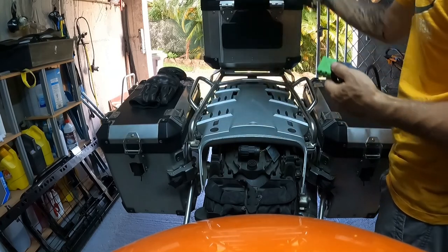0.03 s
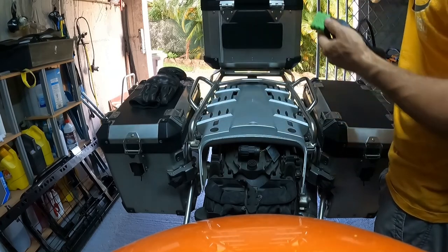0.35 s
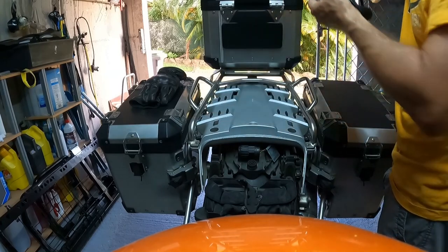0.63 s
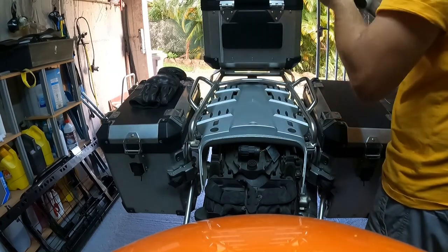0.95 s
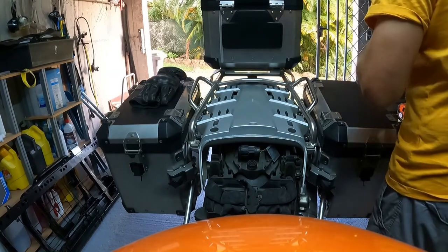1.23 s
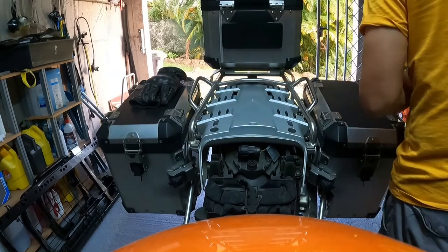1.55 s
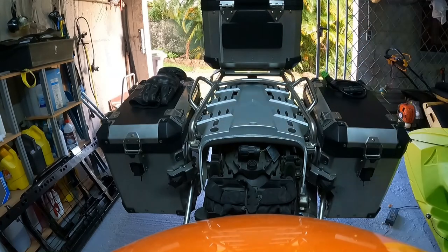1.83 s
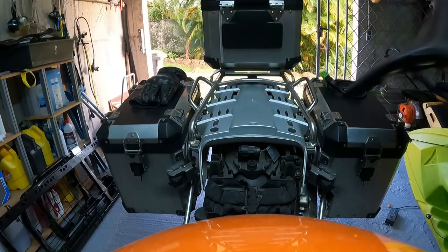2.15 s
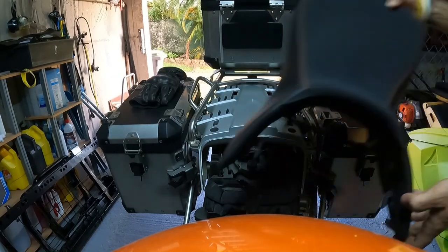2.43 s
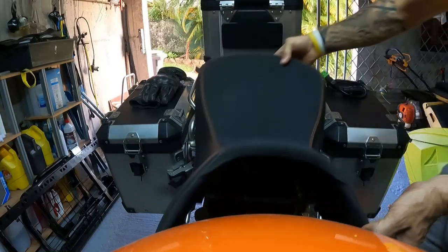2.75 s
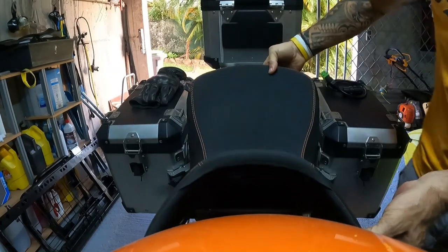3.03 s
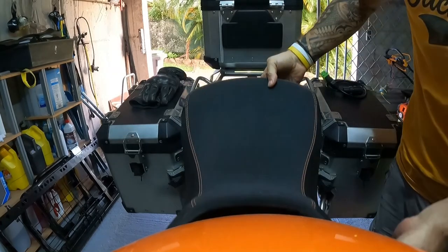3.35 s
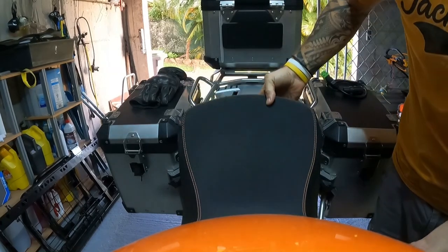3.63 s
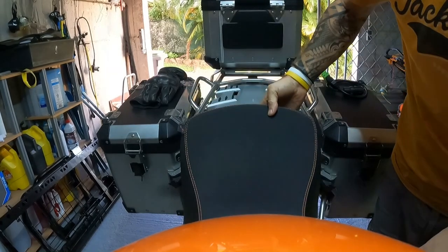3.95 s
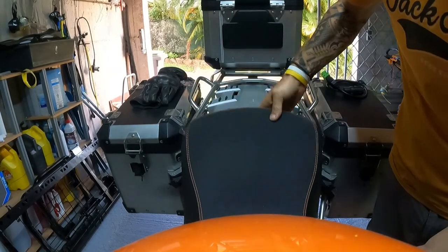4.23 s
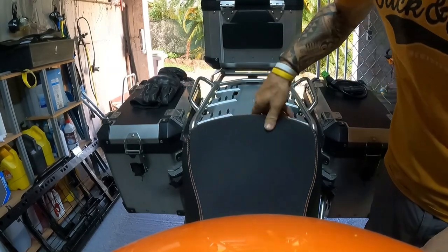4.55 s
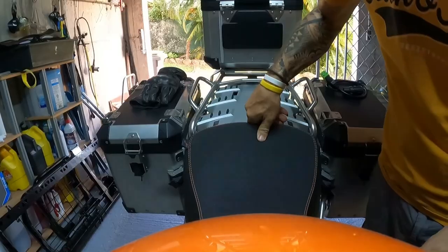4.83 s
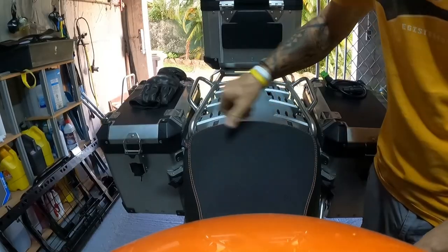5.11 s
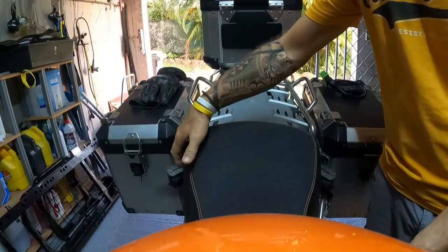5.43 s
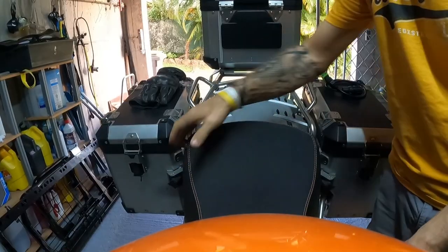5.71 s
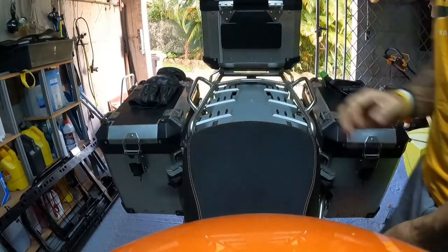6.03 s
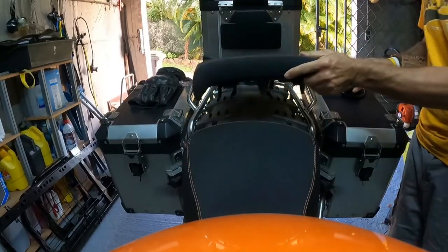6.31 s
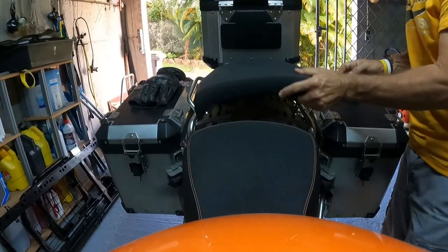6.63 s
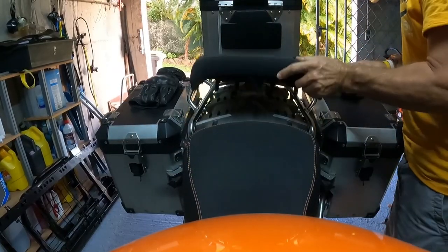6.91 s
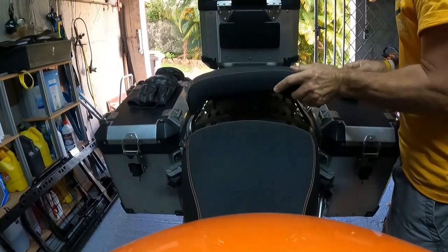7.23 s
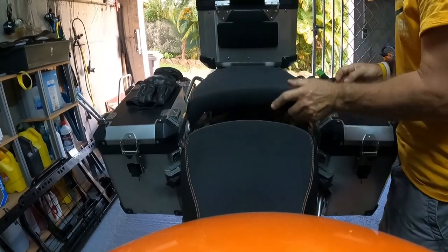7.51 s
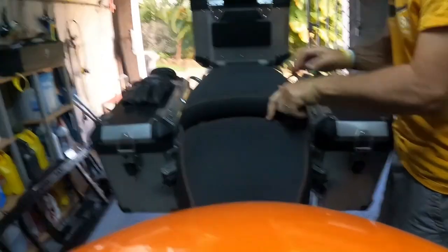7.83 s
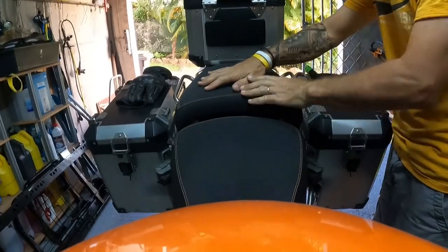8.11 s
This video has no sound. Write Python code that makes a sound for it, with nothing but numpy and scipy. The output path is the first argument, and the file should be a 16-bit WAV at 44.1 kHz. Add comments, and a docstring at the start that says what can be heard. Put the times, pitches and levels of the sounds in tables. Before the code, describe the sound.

Two motorcycle seats knock, scrape and thump into place one after the other, with rustling clothes, close up in a small garage.

```python
"""Two motorcycle seats go on in a small garage, heard close on a stereo microphone fixed to the bike.
A faint hoot sounds far off; clothes and vinyl rustle as the front seat is carried over, its plastic
pan knocking. From about 3 s it creaks and scrapes along the frame, and at 4.8 s it thumps home on its
rubber buffers and the steel latch catches. From 6 s the hollower rear seat clatters into place and is
pressed shut at 7.9 s. All along, shoves rock the bike and quiet air comes in at the open door."""
import sys
import numpy as np
from scipy import signal
from scipy.fft import rfft, irfft
from scipy.io import wavfile
from scipy.ndimage import uniform_filter1d

SR = 44100
rng = np.random.default_rng(int(sys.argv[2]) if len(sys.argv) > 2 else 0)


def persist_wave(psi):
    """Save psi, clipped to +-1, as 16-bit WAV."""
    counts = np.round(np.clip(psi, -1, 1) * 32767).astype(np.int16)
    wavfile.write(sys.argv[1], SR, np.atleast_2d(counts).T)


N = 364707
TIME = np.arange(N) / SR

# Levels in a table are relative to its other rows; each source adds its own gain.
# pan and fittings striking the frame, close to the microphone:
# start_s, level_db, crack_offset_db, tick_offset_db, left_minus_right_db, ring_hz, crack_hz
PAN_KNOCKS = [(0.622, -43, -4, -7, -2, 330, 1910), (0.641, -38.5, -1, -6, 3, 1500, 3470),
              (0.89, -40, -8.5, -20, -2, 330, 1500), (0.904, -42, -5, -10, 0, 1200, 1420),
              (0.923, -42.5, 0, -12, 5, 1500, 3500), (0.967, -45, -3.5, -37, 0, 1210, 1470),
              (1.737, -43.5, -5, -10.5, 1, 1700, 1870), (2.058, -44.5, -12, -28, -4, 330, 1530),
              (2.548, -46.5, -28, -30, 0, 330, 1500), (2.622, -43.5, -9.5, -22, -5, 300, 1800),
              (2.938, -34, -7.5, -12.5, -2.5, 1000, 1100), (3.017, -37, 0.5, -15, -3, 1780, 2000),
              (3.073, -39, -1.5, -7, -2, 600, 2100), (3.667, -18, -7, -14.5, 8, 1200, 1340),
              (3.675, -18, -13.5, -15, -22, 484, 1480), (3.854, -39, -3, -9, -10, 1500, 2200),
              (3.935, -13.5, -28, -51, -1.5, 425, 1300), (3.948, -25, -19.5, -41, -1, 460, 1800),
              (4.328, -22.5, -14.5, -28, -9, 670, 1800), (4.756, -5, -32, -42, -1, 500, 1500),
              (4.766, -22, -31, -15.5, -3, 500, 4000), (5.177, -37, -15, -26, -3, 350, 1500),
              (5.456, -43.5, -8, -27, 3, 546, 1510), (5.478, -30.5, -25, -37, -3, 781, 1500),
              (6.496, -8.5, -14.5, -23, -1.5, 610, 1300), (6.577, -13, -23.5, -41, -0.5, 840, 1800),
              (6.618, -9.5, -20, -34, -1.5, 760, 1180), (7.023, -12, -11.5, -17.5, -1, 890, 3100),
              (7.060, -16.5, -19.5, -33, 1, 880, 2580), (7.174, -28.5, -30, -31, -2.5, 696, 1500),
              (7.196, -16.5, -20, -29, 0, 885, 1370), (7.229, -36, -9, -14, 4, 900, 2880),
              (7.268, -22.5, -32, -37, -1, 485, 1490), (7.320, -24.5, -26, -36, -1, 816, 1190),
              (7.484, -17, -12.5, -30, -1, 1500, 1770), (7.689, -9, -21, -35, -1, 835, 3920),
              (7.720, -20, -19.5, -34, 3, 905, 1790), (7.908, -14, -20.5, -27, -15.5, 990, 2100),
              (7.931, -21, -34, -32, -12, 420, 2400), (7.955, -35.5, -21, -21, -25, 1050, 2400),
              (7.983, -15.5, -21, -30, -11.5, 400, 2780), (7.994, -27, -19, -44, -20, 400, 2600),
              (8.18, -42.5, -13.5, -20, 1, 455, 1800)]
# soft blows on the seat and its rubber buffers: start_s, level_db, bounce_hz
BUFFER_THUMPS = [(0.623, -36, 223), (0.89, -26, 152), (0.911, -24, 133.5), (1.608, -47, 110),
                 (2.063, -39, 196), (2.547, -42.5, 308), (2.585, -45, 360), (2.623, -44, 186),
                 (2.92, -41, 420), (2.966, -38, 82), (3.674, -12.5, 244), (3.699, -15, 162.4),
                 (3.722, -20.5, 81), (3.92, -23.5, 74.6), (3.935, -20, 496), (4.36, -21, 200),
                 (4.401, -18.5, 193), (4.442, -13, 187), (4.681, -19.5, 95.5), (4.755, -17, 113.5),
                 (4.758, -2.5, 194.8), (4.774, -21.5, 527), (5.487, -21, 101), (5.484, -34, 236),
                 (5.798, -36.5, 353), (6.499, -45.5, 404), (6.551, -17.5, 123.6), (6.619, -21.5, 89),
                 (7.024, -23.5, 222), (7.066, -27, 102), (7.201, -22, 55.7), (7.321, -24, 281),
                 (7.485, -21, 218.3), (7.516, -15, 54.6), (7.551, -16.5, 89), (7.691, -11.5, 194),
                 (7.717, -14.5, 199), (7.899, -9.5, 112.4), (7.911, -2.5, 98), (7.928, -6, 187),
                 (7.97, -7.5, 145.7), (7.986, -2.5, 134.5), (7.988, -12, 239), (8.032, -20.5, 95)]
# pan dragged over the frame, one row a push: start_s, length_s, rasp_db, judder_db
PAN_SCRAPES = [(2.946, 0.032, -59, -48), (3.016, 0.062, -42.5, -73), (3.983, 0.12, -36.5, -42.5),
               (4.204, 0.034, -36, -31.5), (4.332, 0.07, -30, -28), (4.435, 0.045, -33, -28.5),
               (4.634, 0.1, -34.5, -27), (4.741, 0.062, -39.5, -26.5), (4.786, 0.12, -42.5, -28.5),
               (5.415, 0.0076, -52.5, -53), (5.461, 0.026, -45.5, -58), (5.566, 0.099, -54, -49.5),
               (5.7, 0.13, -56, -50.5), (7.748, 0.19, -43, -34.5)]
# latch catching: start_s, level_db, rattle_decay_s
LATCH_CATCHES = [(4.442, -41, 0.015), (4.764, -25.5, 0.045), (7.928, -62, 0.0036)]
# plastic and vinyl gripped or forced along: start_s, level_db, length_s, centre_hz, spread_octaves
SEAT_CREAKS = [(1.681, -48.5, 0.022, 3120, 0.15), (2.103, -47.5, 0.02, 910, 1.1),
               (2.208, -47, 0.022, 1400, 0.55), (2.367, -47.5, 0.021, 1120, 0.33),
               (2.975, -45.5, 0.028, 2330, .12), (4.0, -46.5, 0.081, 1700, 0.96),
               (4.213, -41.5, 0.019, 1500, 0.59), (4.229, -34, 0.015, 990, 0.8),
               (4.317, -36.5, 0.09, 1170, 1.15), (4.422, -44, 0.059, 1440, 0.84),
               (4.744, -39, 0.012, 1380, 0.67), (7.851, -46, 0.032, 2300, 0.24),
               (7.895, -37, 0.013, 2620, 0.16)]
# vinyl and rubber under pressure: start_s, level_db, length_s, pitch_hz
SEAT_SQUEAKS = [(4.418, -25, 0.016, 1225), (4.481, -34, 0.013, 1506), (7.961, -35.5, 0.048, 2336),
                (7.963, -39, 0.0068, 6900)]
# brushes of hands, strap and vinyl: peak_s, level_db, length_s, centre_hz
HAND_SCUFFS = [(0.563, -51, 0.014, 5000), (0.668, -57, 0.041, 1850), (0.738, -58, 0.028, 6000),
               (1.08, -59, 0.077, 1560), (1.335, -57, 0.071, 3640), (1.492, -49.5, 0.047, 1700),
               (1.632, -49, 0.053, 1680), (1.684, -49, 0.018, 1500), (1.801, -48.5, 0.022, 880),
               (2.095, -52.5, 0.047, 1140), (2.738, -51, 0.018, 1210), (3.07, -38.5, 0.018, 2010),
               (3.663, -34, 0.013, 1390), (3.69, -42.5, 0.039, 7150), (3.795, -44.5, 0.038, 2100),
               (4.626, -43.5, 0.024, 900), (4.674, -41, 0.013, 4300), (4.754, -34, 0.019, 3480),
               (5.183, -50.5, 0.045, 1180), (5.209, -62.5, 0.035, 4460), (5.315, -56.5, 0.011, 3470),
               (5.789, -58.5, 0.049, 4940), (5.834, -48.5, 0.013, 1000), (5.99, -63.5, 0.043, 4000),
               (6.1, -53.5, 0.02, 3500), (6.322, -51, 0.032, 3500), (6.874, -53, 0.034, 1230),
               (7.003, -46, 0.043, 600), (8.039, -48, 0.011, 5440), (8.055, -65, 0.0057, 6000)]
# sweeps of arm and seat that rub sleeves and vinyl: peak_s, level_db, length_s
ARM_SWEEPS = [(0.143, -72.5, 11.4), (0.705, -58, 0.34), (1.487, -53, 0.15), (1.684, -58, 0.23),
              (2.322, -51.5, 0.66), (2.98, -48, 0.14), (3.846, -51, 0.24), (4.404, -52.5, 0.21),
              (4.79, -41.5, 0.093), (6.135, -60.5, 0.26), (6.34, -52, 0.1), (6.515, -54, 0.19),
              (6.934, -63, 1), (7.52, -64.5, 1.2), (7.817, -49, 0.26)]
# shoves that rock the bike on its stand: start_s, level_db
BIKE_SHOVES = [(0.621, -23), (0.929, -24), (1.59, -38.5), (2.091, -32.5), (2.5, -62), (2.94, -44.5),
               (3.28, -53), (3.656, -18), (3.92, -28), (4.33, -33), (4.64, -30), (4.76, -49), (5.07, -38),
               (5.459, -35), (6.51, -26), (6.64, -25.5), (6.92, -38), (7.2, -21.5), (7.4, -22),
               (7.5, -27.5), (7.89, -24.5)]
# course of the far-off hoot: time_s, pitch_hz, level_db
HOOT_CURVE = [(0, 526.6, -48.5), (0.061, 542.5, -51.5), (.13, 569, -54), (.18, 531, -62.5), (.23, 548, -63)]

# modes of the two seat pans, the frame and the latch: pitch_hz, level_db, t60_s
FRONT_SEAT_MODES = [(281, 2, 0.07), (372.6, -3.5, 0.39), (429, 6, 0.072), (536, 3.5, 0.14),
                    (800, 0, 0.0066), (953, 1, 0.059), (954, 0.5, 0.038), (1200, -3, 0.024),
                    (1550, -6.5, 0.049), (1660, -32, 0.032), (2020, -8, 0.05)]
REAR_SEAT_MODES = [(242, -3, 0.15), (426, 2, 0.2), (470, 6, 0.14), (526, -4.5, 0.27), (593, -1, 0.11),
                   (809.4, 1.5, 0.12), (917, 0, 0.062), (1020, 0.5, 0.11), (1160, -14, 0.06),
                   (1530, -12.5, 0.12), (1760, -7, 0.066)]
BIKE_FRAME_MODES = [(66.4, 10, 0.41), (93, 5.5, 0.74), (110, 1, 1), (148.3, 10, 0.36), (177.5, 7, 0.5),
                    (201, 10, 0.26), (241.8, 8, 0.36), (380, -5.5, 0.32)]
STEEL_MODES = [(3920, -14, .1), (4575, -6, .12), (5680, -1, .12), (7160, -12, .1), (7690, 0, 0.13),
               (7950, 2, 0.13), (8220, 1, 0.12), (8520, -2, 0.12)]

# spectrum of each sound: frequency_hz, level_db
KNOCK_SPECTRUM = [(150, -23), (350, 13.5), (600, 18), (1150, 10.5), (1700, -9), (3300, -14), (6000, -60),
                  (12000, -77)]  # hollow pan
CRACK_SPECTRUM = [(300, -54), (900, 15.5), (1400, 9.5), (1900, 10.5), (2800, 4.5), (4200, 2), (6000, -3.5),
                  (10000, -43.5), (16000, -70)]  # hard edges meeting
TICK_SPECTRUM = [(500, -53), (2500, 4), (4200, 16), (5500, 13.5), (7300, 9.5), (9000, -5.5), (11000, -18),
                 (16000, -30)]  # top of that contact
BODY_SPECTRUM = [(20, -63.5), (90, 1.5), (170, 1.5), (270, -2), (400, 2), (700, -16.5), (2000, -56),
                 (8000, -73)]  # push on the whole seat
RASP_SPECTRUM = [(160, 0.5), (280, -13.5), (446, 7.5), (573, 4.5), (623, -4), (899, 2), (1410, -9.5),
                 (1780, -9.5), (3350, -22), (7330, -31), (11100, -47), (13800, -44), (15000, -64)]  # sliding plastic
JUDDER_SPECTRUM = [(50, -56), (100, 0.5), (185, 6), (250, 3.5), (340, -3), (600, -62)]  # gripping rubber
RATTLE_SPECTRUM = [(1000, 5), (2500, 2.5), (4500, 2.5), (8300, -4.5), (10500, -15.5), (12400, -12.5),
                   (13600, -21), (15500, -34)]  # catch entering its slot
JINGLE_SPECTRUM = [(3000, -40), (7200, -19), (7700, 2), (8000, 0), (8450, -4), (9000, -20), (11000, -32),
                   (11800, -14.5), (12700, -15), (13500, -36), (15000, -48)]  # close modes of the catch
RUSTLE_SPECTRUM = [(120, -65), (200, 1), (240, -17.5), (310, -12), (454, -5), (715, -13.5), (783, -21),
                   (1030, -6), (2650, -10.5), (6590, -14), (10800, -28), (12200, -33), (15500, -60)]  # cloth and vinyl
SWAY_SPECTRUM = [(12, -34.5), (25, 2), (38, -2), (52, 0.5), (75, -18), (130, -19.5), (250, -25.5),
                 (600, -81)]  # rocking bike
AIR_SPECTRUM = [(35, -24), (60, -16), (93, -32), (156, 0.5), (253, -5.5), (298, -0.5), (368, -11),
                (533, -11.5), (849, -23.5), (1170, -11), (3500, -29.5), (6260, -32.5), (15500, -50)]  # outdoor air

# reverberation of the garage: frequency_hz, t60_s
GARAGE_DECAY = [(100, 0.5), (260, 0.23), (700, 0.3), (1840, 0.29), (4850, 0.19), (12000, 0.16)]
# stereo width of its echoes: frequency_hz, side_minus_mid_db
GARAGE_WIDTH = [(100, -7), (300, -16.5), (700, -10), (1500, -8.5), (3000, -4.5), (12000, -6)]

REAR_S, SHUT_S = 6.0, 7.9  # the rear seat is taken up, then closes over the frame
SHUT_ROOM_DB = -9.5  # the closed seat muffles what escapes into the garage


def knocks(knock_db=13, crack_db=26, tick_db=26, body_room_db=-5, edge_room_db=-3, travel_s=0.001392):
    """Each blow cracks, rings the hollow pan and pushes its body; gives the close sound and room feed."""
    near, far = np.zeros((2, N)), np.zeros(N)
    tick, body = click(TICK_SPECTRUM), click(BODY_SPECTRUM)
    for s, level_db, hard_db, top_db, pan_db, ring_hz, crack_hz in PAN_KNOCKS:
        room_db, body_db = (-1.5, 5) if s < SHUT_S else (SHUT_ROOM_DB, 9.5)
        # each contact point favours one part of the knock and of the crack
        knock = click(emphasised(KNOCK_SPECTRUM, ring_hz, lift_db=3, octaves=0.27))
        crack = click(emphasised(CRACK_SPECTRUM, crack_hz, lift_db=5.5, octaves=0.36))
        shell = pan_ring(s, ring_hz)
        add(shell, 0, knock)
        shell = bend(amp(level_db + knock_db) * shell, travel_s)
        add(near, s, place(shell, pan_db))
        add(far, s, shell * amp(room_db))
        # the push on the body goes mostly through the frame
        heave = bend(amp(level_db + knock_db + body_db) * body, travel_s)
        add(near, s, place(heave, pan_db))
        add(far, s, heave * amp(room_db + body_room_db))
        # hard edges chatter as they meet; in the echoes this blurs into one
        edge = amp(level_db) * (amp(crack_db + hard_db) * crack + amp(tick_db + top_db) * tick)
        add(near, s, bend(signal.fftconvolve(edge, chatter(decay_s=0.0043)), travel_s / 2))
        add(far, s, edge * amp(room_db + edge_room_db))
    return near, far


def pan_ring(s, ring_hz, focus_db_per_octave=6):
    """The struck spot favours modes near one pitch; the grip detunes them and a closed seat damps them."""
    modes, ring_db, detune = (FRONT_SEAT_MODES, -1, 0.027) if s < REAR_S else (REAR_SEAT_MODES, -2.5, 0.0074)
    t60_share = 1 if s < SHUT_S else 0.52
    struck = [(hz, db - focus_db_per_octave * abs(np.log2(hz / ring_hz)), t60 * t60_share)
              for hz, db, t60 in modes]
    return amp(ring_db) * ring(struck, detune)


def thumps(squash_s=0.0028, reference_hz=150, frame_db=8.5, frame_db_per_db=0.64):
    """The seat bounces on its buffers and rings the frame; that ring grows more slowly than the blow."""
    out, t = np.zeros(N), TIME[:SR // 2]
    for s, db, hz in BUFFER_THUMPS:
        reference_t60_s, held_db = (0.15, 0) if s < SHUT_S else (0.067, -6)  # hands hold the shut seat
        t60_s = reference_t60_s / np.sqrt(hz / reference_hz)  # stiffer bounces die sooner
        bounce = np.sin(2 * np.pi * hz * t) * amp(-60 * t / t60_s) * (1 - np.exp(-t / squash_s))
        frame = amp(frame_db + frame_db_per_db * db + held_db) * ring(BIKE_FRAME_MODES, detune=0.014)
        add(out, s, amp(db) * bounce + frame)
    return out


def scrapes(rasp_gain_db=-1, judder_gain_db=-3, ring_db=-7, uneven_db=5):
    """Plastic sticks and slips on the frame: fine slips ring the pan, coarse ones judder the rubber."""
    fine = slips(per_s=1200, scatter_db=2) * amp(uneven_db * np.tanh(walk(110)))
    ringing = unit(signal.fftconvolve(fine, ring(FRONT_SEAT_MODES, detune=0.0031))[:N])
    rasp = unit(colour(fine, RASP_SPECTRUM) + amp(ring_db) * ringing)
    rasp = bend(rasp, travel_s=0.002116)
    judder = colour(slips(per_s=250, scatter_db=6.5), JUDDER_SPECTRUM)
    sliding, gripping = np.zeros(N), np.zeros(N)
    for s, length_s, rasp_db, judder_db in PAN_SCRAPES:
        add(sliding, s, amp(rasp_db + rasp_gain_db) * push(length_s))
        add(gripping, s, amp(judder_db + judder_gain_db) * push(length_s))
    return rasp * sliding + judder * gripping


def push(length_s, attack_s=0.0031, sag_db_per_s=13, release_db_per_s=341):
    """Envelope of a push: it bites quickly, sags while it slides, and dies when the seat stops."""
    t = TIME[:SR]
    fall_db = sag_db_per_s * t + release_db_per_s * np.maximum(t - length_s, 0)
    return np.minimum(t / attack_s, 1) * amp(-fall_db)


def latch(gain_db=23.5, ring_db=-14, jingle_db=-9):
    """The steel catch rattles into its slot with a short ring and a jingle of many close modes."""
    out = np.zeros(N)
    for s, db, rattle_decay_s in LATCH_CATCHES:
        steel = amp(ring_db) * ring(STEEL_MODES, detune=0.0051)
        add(steel, 0, signal.fftconvolve(click(RATTLE_SPECTRUM), chatter(rattle_decay_s)))
        add(steel, 0, amp(jingle_db) * signal.fftconvolve(click(JINGLE_SPECTRUM), chatter(decay_s=0.04)))
        add(out, s, amp(db + gain_db) * steel)
    return out


def creaks(gain_db=21, slips_per_s=450, ring_cycles=2.1, scatter_db=4.5, start_db=-5.5, build_s=0.011):
    """Dense, uneven slips grow as the pressure builds, each ringing a different spot of the pan."""
    out, t = np.zeros(N), TIME[:SR // 50]
    for s, db, length_s, centre_hz, octaves in SEAT_CREAKS:
        for at in np.arange(0, length_s, 1 / slips_per_s):
            late, spot, force, polarity = rng.uniform(-1, 1, 4)
            hz = centre_hz * 2 ** (octaves * spot)
            grain = np.sin(2 * np.pi * hz * t) * np.exp(-hz * t / ring_cycles)
            grain *= np.sign(polarity) / np.linalg.norm(grain)
            slip_db = db + gain_db + scatter_db * force + start_db * np.exp(-at / build_s)
            add(out, s + at + late / slips_per_s, amp(slip_db) * grain)
    return out


def squeaks(waver=0.045, rough_db=2.5):
    """Fast, nearly regular stick-slip gives a short, rough, unsteady tone."""
    out = np.zeros(N)
    for s, db, length_s, hz in SEAT_SQUEAKS:
        size = int(length_s * SR)
        phase = 2 * np.pi * np.cumsum(hz * (1 + waver * walk(600)[:size])) / SR
        grip = unit(amp(rough_db * walk(415)[:size]))
        add(out, s, amp(db) * grip * np.sin(phase) * np.sqrt(np.hanning(size)))
    return out


def scuffs(gain_db=1, skirt_db=-8, crisp_db=-7, rise_share=0.3, fall_share=0.5):
    """Each brush of hand or strap is a soft swell of fine slips and a few crisp ones, in one band."""
    out, t = np.zeros(N), TIME[:SR // 2] - 1 / 4
    grains = unit(slips(per_s=2600, scatter_db=2)) + amp(crisp_db) * unit(slips(per_s=130, scatter_db=5))
    for s, db, length_s, hz in HAND_SCUFFS:
        upper_hz = min(hz * 1.77, 8000)
        band = click([(hz / 10, -24), (hz / 4, skirt_db), (hz, 0), (upper_hz, skirt_db), (13000, -42)])
        stretch = np.roll(grains, -int(s * SR))[:len(t)]
        brush = unit(signal.fftconvolve(stretch, band)[:len(t)])
        width_s = length_s * np.where(t < 0, rise_share, fall_share)
        add(out, s + t[0], amp(db + gain_db) * brush * np.exp(-(t / width_s) ** 2 / 2))
    return out


def rustle(gain_db=4, flutter_db=2, rise_share=0.43, edge_db=-11.5):
    """Cloth and vinyl rub in a fluttering stream of grains, loudest where each sweep is fastest."""
    grains = slips(per_s=5000, scatter_db=6.5) * amp(flutter_db * walk(35))
    power = 0
    for peak_s, db, length_s in ARM_SWEEPS:
        # 0 at the peak, 1 at both ends of the sweep
        away = np.maximum((peak_s - TIME) / rise_share, (TIME - peak_s) / (1 - rise_share)) / length_s
        power += amp(db + edge_db * away) ** 2
    return colour(grains, RUSTLE_SPECTRUM) * np.sqrt(power) * amp(gain_db)


def sway(gain_db=-3, rise_s=0.015, decay_db_per_s=49, rest_db=-61):
    """Each shove starts a low, slowly dying shudder that reaches the microphone through its mount."""
    mid, side = (colour(rng.standard_normal(N), SWAY_SPECTRUM) for _ in range(2))
    rocking = np.minimum(TIME / rise_s, 1) * amp(-decay_db_per_s * TIME)
    power = np.full(N, amp(rest_db) ** 2)
    for s, db in BIKE_SHOVES:
        add(power, s, (amp(db) * rocking) ** 2)
    return spread(mid, side, side_db=-14) * np.sqrt(power) * amp(gain_db)


def hoot(waver=0.082, overtone_step_db=-9):
    """Far off, a short wavering tone with two weak overtones."""
    s, hz, db = np.transpose(HOOT_CURVE)
    phase = 2 * np.pi * np.cumsum(np.interp(TIME, s, hz) * (1 + waver * walk(150))) / SR
    envelope = uniform_filter1d(amp(np.interp(TIME, s, db, left=-140, right=-140)), 200)
    return envelope * sum(amp(overtone_step_db * k) * np.sin((k + 1) * phase) for k in range(3))


def air(level_db=-62, wander_db=0.25):
    """Quiet outdoor air through the open door."""
    mid, side = (colour(rng.standard_normal(N), AIR_SPECTRUM) for _ in range(2))
    return spread(mid, side, side_db=-6) * amp(level_db + wander_db * walk(21))


def garage(x, build_s=0.00083):
    """Dense echoes of walls and shelves; two closely spaced capsules hear nearly the same bass."""
    t = TIME[:int(.7 * SR)]
    octave = np.log2(np.clip(np.fft.rfftfreq(len(t), 1 / SR), 100, 12800) / 100)
    noise, tail = rfft(rng.standard_normal((2, len(t)))), 0
    for k in range(8):
        hz = 100 * 2 ** k
        mid, side = irfft(noise * np.maximum(1 - abs(octave - k), 0), len(t))
        decay = amp(-60 * t / on_log_axis(GARAGE_DECAY, hz))
        tail += spread(mid, side, on_log_axis(GARAGE_WIDTH, hz)) * decay
    tail *= 1 - np.exp(-(t / build_s) ** 2)
    tail /= np.linalg.norm(tail.mean(axis=0))
    return signal.fftconvolve(x[None], tail, axes=1)[:, :N]


def moving_echoes(x, paths=3):
    """A moving source keeps changing its paths to the walls, so no fixed colour builds up."""
    shares = np.array([walk(90) for _ in range(paths)])
    shares /= np.sqrt(np.sum(shares ** 2, axis=0))
    return sum(garage(x * share) for share in shares)


def ring(modes, detune):
    """Decaying modes of alternating sign, each off pitch by a random share; energy 1."""
    t, y = TIME[:SR // 2], 0
    for k, (hz, db, t60) in enumerate(modes):
        pitch_hz = hz * (1 + detune * rng.standard_normal())
        y += (-1) ** k * amp(db - 60 * t / t60) * np.sin(2 * np.pi * pitch_hz * t)
    return y / np.linalg.norm(y)


def bend(x, travel_s):
    """Bending waves in a plate: treble arrives first, so clicks chirp; travel_s is the delay at 1 kHz."""
    hz = np.fft.rfftfreq(len(x), 1 / SR)
    return irfft(rfft(x) * np.exp(-4j * np.pi * travel_s * np.sqrt(1000 * hz)), len(x))


def chatter(decay_s):
    """A dying burst of tiny contacts; energy 1."""
    t = TIME[:SR // 4]
    burst = rng.standard_normal(len(t)) * np.exp(-t / decay_s)
    return burst / np.linalg.norm(burst)


def slips(per_s, scatter_db):
    """Tiny stick-slip releases at random moments and of uneven size."""
    releases = (rng.random(N) < per_s / SR) * rng.choice([-1, 1], N)
    return releases * amp(scatter_db * np.minimum(rng.exponential(size=N), 4))


def walk(rate_hz):
    """Smooth random wander with a spread near 1."""
    size = int(SR / rate_hz)
    steps = np.repeat(rng.standard_normal(N // size + 1), size)
    return 1.2 * uniform_filter1d(steps, size)[:N]


def click(spectrum, size=8192):
    """Shortest causal pulse with a given spectrum; energy 1."""
    hz = np.fft.rfftfreq(size, 1 / SR)
    cepstrum = irfft(np.log(amp(on_log_axis(spectrum, hz))))
    cepstrum[1:size // 2] *= 2
    cepstrum[size // 2 + 1:] = 0
    pulse = irfft(np.exp(rfft(cepstrum)))
    return pulse / np.linalg.norm(pulse)


def colour(x, spectrum):
    """Filter by a spectrum; rms 1."""
    return unit(signal.fftconvolve(x, click(spectrum))[:N])


def emphasised(spectrum, centre_hz, lift_db, octaves):
    """A spectrum with one broad resonance raised out of it."""
    hz = np.geomspace(100, 16000, 80)
    bump_db = lift_db * np.exp(-(np.log2(hz / centre_hz) / octaves) ** 2)
    return np.column_stack([hz, on_log_axis(spectrum, hz) + bump_db])


def on_log_axis(points, hz):
    """Read (frequency_hz, value) points on a log-frequency axis."""
    f, value = np.transpose(points)
    return np.interp(np.log(hz + 1e-3), np.log(f), value)


def amp(db):
    """Decibels to gain."""
    return 10 ** (np.asarray(db) / 20)


def unit(x):
    """Scale to rms 1."""
    return x / np.sqrt(np.mean(x ** 2))


def add(track, s, sound):
    """Mix a sound into a track at a time."""
    start = max(int(s * SR), 0)
    part = sound[..., :N - start]
    track[..., start:start + part.shape[-1]] += part


def place(x, pan_db):
    """Mono to stereo, with the left pan_db above the right."""
    return x * amp(np.array([[pan_db], [-pan_db]]) / 2)


def spread(mid, side, side_db):
    """Mid and side to left and right."""
    return mid + amp(side_db) * side * np.array([[1], [-1]])


def scene(rub_near_db=-2, rub_room_db=-4, cloth_near_db=-6, cloth_room_db=-3, thump_room_db=-16):
    """Airborne sounds fill the garage; the low ones reach the microphone mostly through the frame."""
    knock_near, knock_far = knocks()
    rubbing = scrapes() + creaks() + squeaks() + latch()
    cloth = scuffs() + rustle()
    low = thumps()
    through_frame = place(low + sway(), pan_db=-1.5)
    near = knock_near + amp(rub_near_db) * rubbing + amp(cloth_near_db) * cloth + through_frame
    under_seat = amp(rub_room_db) * rubbing + amp(thump_room_db) * low
    escaping = amp(SHUT_ROOM_DB * uniform_filter1d(1.0 * (TIME > SHUT_S), 400))
    far = knock_far + escaping * under_seat + amp(cloth_room_db) * cloth + hoot()
    return near + moving_echoes(far) + air()


def record(dry, width_db=1, narrow_s=4.187, reopen_s=6.08, narrow_db_per_s=69, low_hz=20, top_hz=15700):
    """The image fades to mono as the front seat goes in, then reopens; deep rumble and top are cut."""
    left, right = dry
    narrowing_db = narrow_db_per_s * np.maximum(TIME - narrow_s, 0) * (TIME < reopen_s)
    out = spread((left + right) / 2, (left - right) / 2, width_db - np.minimum(narrowing_db, 42))
    out = signal.sosfilt(signal.butter(2, low_hz, "high", fs=SR, output="sos"), out)
    return signal.sosfilt(signal.ellip(8, .2, 70, top_hz, fs=SR, output="sos"), out)


dry = scene()
out = record(dry)
persist_wave(out)
```